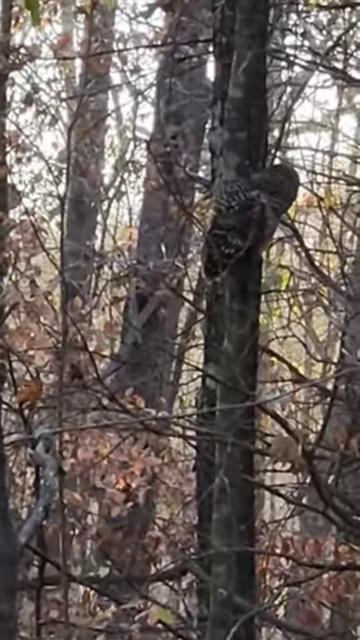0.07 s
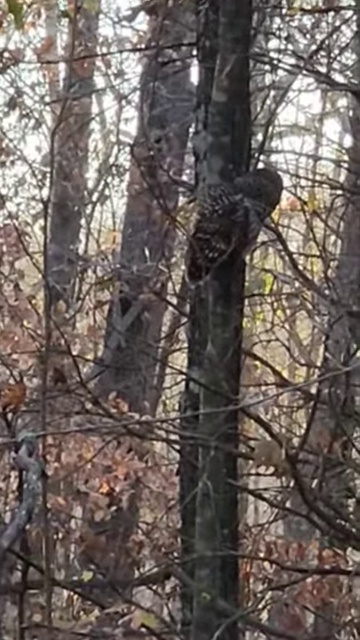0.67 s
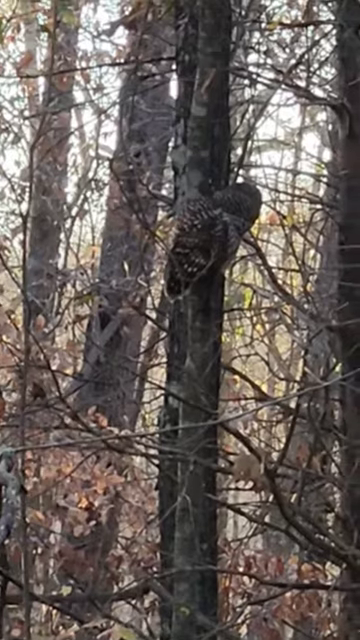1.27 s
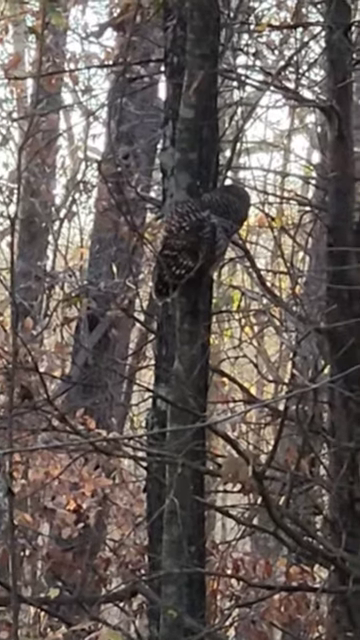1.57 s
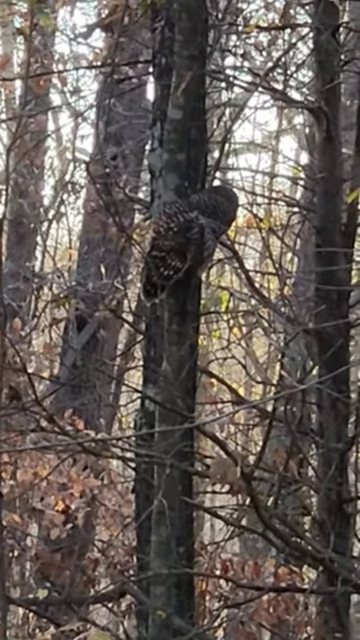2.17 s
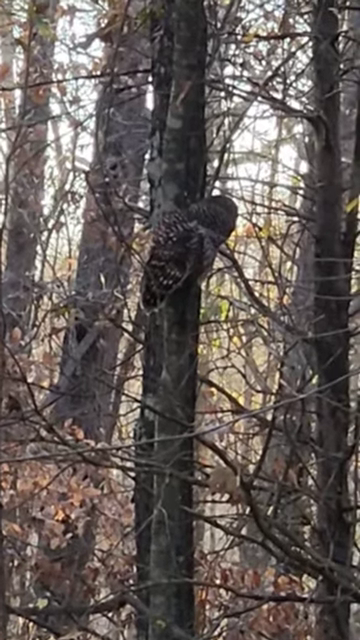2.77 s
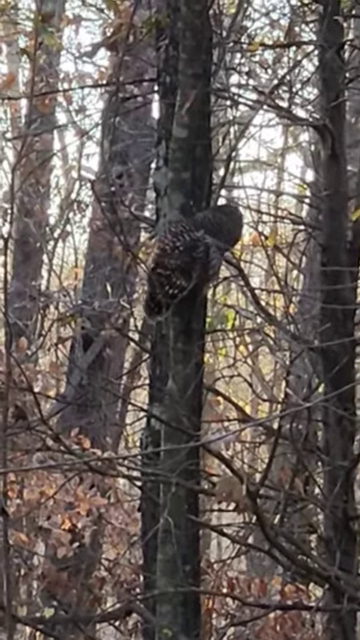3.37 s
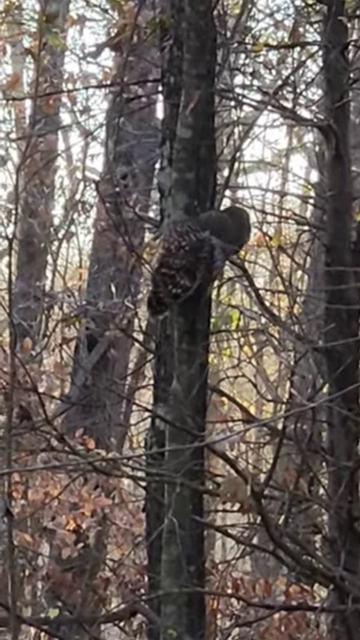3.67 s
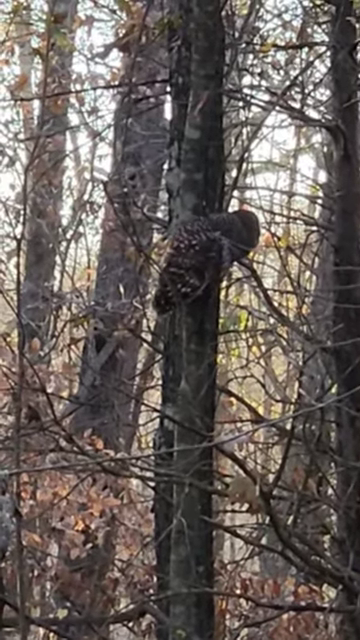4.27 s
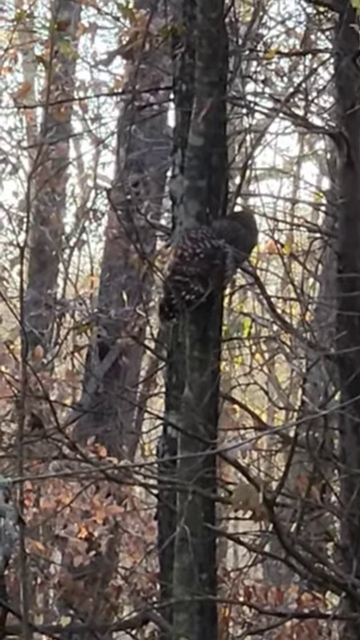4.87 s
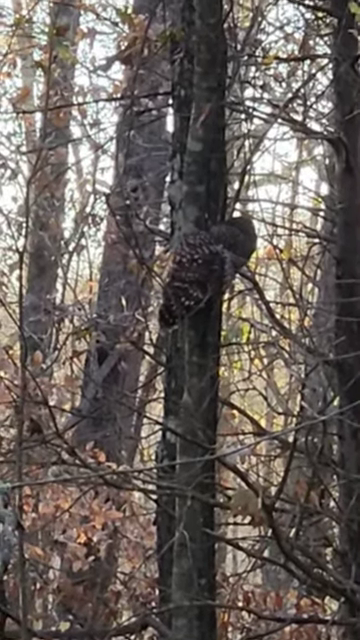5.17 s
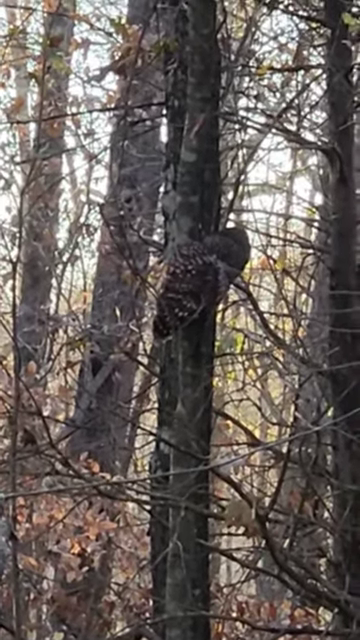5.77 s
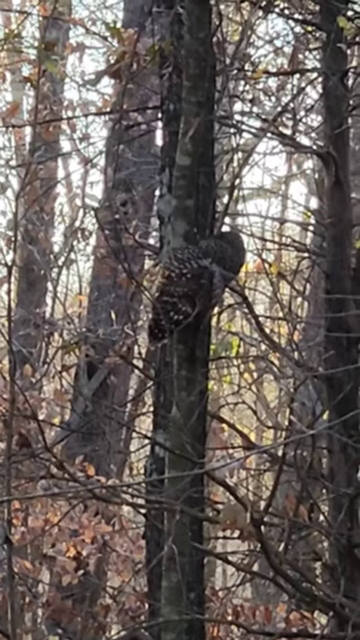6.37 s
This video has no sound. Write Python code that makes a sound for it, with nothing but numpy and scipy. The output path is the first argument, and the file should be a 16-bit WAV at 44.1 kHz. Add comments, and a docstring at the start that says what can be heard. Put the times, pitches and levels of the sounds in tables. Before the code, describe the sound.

In a still wood, a low distant rumble and a soft hiss run throughout. Near the start a hand rubs briefly close to the microphone and a sleeve swishes, followed by a few faint twig ticks and a tiny bird peep. Then an owl gives one hoot, by far the loudest sound: it starts reedy, leaps to a round high note and drops into a raspy downward slide. Soft echoes return from the trees.

```python
"""An owl gives one falling hoot from a pine in a still wood. Membranes in its voice box vibrate:
the call starts reedy, leaps to a round high note and drops back into a reedy slide.
Nearby trunks scatter the hoot, and a far tree line sends it back as echoes.
Before the hoot, a hand rubs on the phone and a sleeve swishes. Twigs tick, small birds peep, and
faint blurred swells, hums and a whistle pass over a low distant rumble and a soft hiss."""
import sys
import numpy as np
from scipy import signal
from scipy.fft import rfft, irfft, next_fast_len
from scipy.io import wavfile
from scipy.ndimage import uniform_filter1d

SR = 44100
rng = np.random.default_rng(int(sys.argv[2]) if len(sys.argv) > 2 else 0)


def generate_wav(signal):
    """Clip the signal to [-1, 1] and save it as 16-bit WAV at the path in sys.argv[1]."""
    frames = np.transpose(np.atleast_2d(signal))
    scaled = np.clip(frames, -1, 1) * 32767
    pcm = np.round(scaled).astype(np.int16)
    wavfile.write(sys.argv[1], SR, pcm)


N = 283122
T = np.arange(N) / SR

# the hoot starts low, leaps to its high note, drops back and slides down to its end
START_S, LEAP_S, DROP_S, END_S = 3.976, 4.038, 4.549, 4.825
LEAP_EASE_S, DROP_EASE_S = .005, .012


def undb(db):
    """Turn decibels into a number to multiply by."""
    return 10 ** (np.asarray(db) / 20)


def unit(x):
    """Scale a signal to an average strength (rms) of 1."""
    return x / np.sqrt(np.mean(x ** 2))


def at(points, hz):
    """Look up a value between (pitch_hz, value) points, spaced by octaves."""
    f, value = np.transpose(points)
    return np.interp(np.log(np.maximum(hz, 1)), np.log(f), value)


def colour(x, points):
    """Turn a sound's lows and highs up or down along (pitch_hz, gain_db) points."""
    n = x.shape[-1]
    size = next_fast_len(n)
    gain = undb(at(points, np.fft.rfftfreq(size, 1 / SR)))
    return irfft(rfft(x, size) * gain, size)[..., :n]


def band(n, hz, octaves):
    """Stereo noise gathered around one pitch."""
    f = np.maximum(np.fft.rfftfreq(n, 1 / SR), 1)
    bell = np.exp(-.5 * (np.log2(f / hz) / octaves) ** 2)
    return unit(irfft(rfft(rng.standard_normal((2, n))) * bell / np.sqrt(f), n))


def walk(rate):
    """A smooth random wobble of size about 1 that changes about rate times a second."""
    k = max(int(SR / rate), 2)
    steps = np.repeat(rng.standard_normal(N // k + 1), k)
    return unit(uniform_filter1d(uniform_filter1d(steps, k), k)[:N])


def pan(db):
    """Left and right gains that make the left side db decibels louder."""
    return undb(np.array([[.5], [-.5]]) * db)


def ramp(s, length):
    """Rise from 0 at time s to 1 over length seconds."""
    return np.clip((T - s) / length, 0, 1)


def flip(s, ease_s):
    """Switch smoothly from 0 to 1 around time s."""
    return .5 + .5 * np.tanh((T - s) / ease_s)


def swell(t, peak_s, width_s):
    """A bell-shaped rise and fall."""
    return np.exp(-.5 * ((t - peak_s) / width_s) ** 2)


def tones(table, waver, rate):
    """Thin gliding tones that swell and fade, their pitch wavering."""
    out = 0
    for s, start_hz, end_hz, width, db in table:
        hz = np.interp(T, [s - width, s + width], [start_hz, end_hz]) * (1 + waver * walk(rate))
        out = out + undb(db) * swell(T, s, width) * np.sin(2 * np.pi * np.cumsum(hz) / SR)
    return out


def background(rumble_db=-54.5, rumble_side_db=-24, air_db=-76.5):
    """A distant rumble, nearly alike on both sides, and the wood's hiss, wider in its highs."""
    # tone of the rumble and of the hissing air: pitch_hz, gain_db
    rumble_tone = [(15, -29), (28, -17.5), (40, -1.5), (52, -6), (64, 5), (75, -4), (88, -4.5), (112, -8),
                   (135, -13), (165, -22.5), (215, -24.5), (330, -36.5), (500, -72)]
    air_tone = [(100, -3), (300, -4), (470, -2.5), (720, -0.5), (950, -4.5), (1500, -3.5), (1900, -6),
                (2300, -13.5), (3300, -16), (4500, -20), (7300, -18.5), (9000, -30.5), (15000, -29)]
    noise = rng.standard_normal((5, N))
    sideways = undb(rumble_side_db) * noise[1] * np.array([[1], [-1]])
    rumble = unit(colour(noise[0] + sideways, rumble_tone))
    shared = colour(noise[2], [(300, -4.5), (700, -2.5), (1400, -11), (3000, -21.5)])
    apart = colour(noise[3:], [(300, 4.5), (700, -5.0), (1400, -1.5), (3000, 0)])
    left, right = apart + shared
    right = colour(right, [(300, -2.5), (1200, -3.5), (4000, -3.5), (7500, -9.0), (14000, 2.0)])
    air = unit(colour(np.array([left, right]), air_tone))
    sway_db = .3 * walk(5)
    return (rumble * undb(rumble_db) + air * undb(air_db)) * undb(sway_db)


def hand(left_db=-12):
    """Skin slips over the phone's case in many tiny catches, close to the right microphone."""
    # strokes of the hand: start_s, rise_s, hold_s, level_db, fade_db_per_s
    strokes = [(0, .1, .33, -79.5, 250), (.483, 0.0082, 0.028, -53, 330),
               (0.555, 0.0047, 0.0057, -56.5, 642), (0.696, .03, 0.046, -73.5, 450)]
    # tone of the rubbed case: pitch_hz, gain_db
    case_tone = [(200, -14), (350, -13), (550, -17), (750, -3), (900, -9), (1150, 1.5), (1600, -4),
                 (2300, -5.5), (3300, -11.5), (4800, -16.5), (7500, -13), (9700, -25.5), (11200, -18),
                 (12500, -23), (15000, -19)]
    slip = sum(ramp(s, rise) * undb(db - fade * np.maximum(T - s - rise - hold, 0))
               for s, rise, hold, db, fade in strokes)
    catches = rng.standard_normal((2, N)) * undb(2.2 * walk(1200))
    return unit(colour(catches, case_tone)) * slip * undb([[left_db], [0]])


def sleeve(peak_s=0.49, peak_db=-68, rise_db_per_s=24, fall_db_per_s=38, left_db=-3):
    """A sleeve shifts with the hand: one soft swish that swells and fades."""
    # tone of the cloth: pitch_hz, gain_db
    cloth_tone = [(100, -16), (200, 2.5), (300, 11.5), (450, -5), (750, 3), (950, -10.5), (1200, 2.5),
                  (1550, -2), (1900, -21), (2700, -15.5), (4500, -23), (8000, -13.5), (10000, -26.5),
                  (14000, -17)]
    level_db = peak_db - np.maximum(rise_db_per_s * (peak_s - T), fall_db_per_s * (T - peak_s))
    swish = unit(colour(rng.standard_normal((2, N)), cloth_tone))
    return swish * undb(level_db + 1.9 * walk(39.1)) * undb([[left_db], [0]])


def hums():
    """Faint low tones come and go far away."""
    # far-off hums: peak_s, start_hz, end_hz, width_s, level_db
    notes = [(.7, 369, 355, 0.35, -82.5), (3.45, 565, 585.5, 0.45, -84.5), (5.7, 345, 341.1, 0.18, -81.5)]
    return tones(notes, waver=.016, rate=40)


def ticks(tail_db=-18, tail_s=0.051):
    """Twigs and fingers make short dry cracks, each with a faint scattered tail."""
    # cracks: start_s, level_db, pitch_hz, width_octaves, decay_ms, left_minus_right_db
    cracks = [(0.707, -68.5, 1930, 0.33, 1.9, -18), (1.021, -62, 2500, 1.6, 0.84, -4),
              (1.112, -66, 2500, 0.45, 1, 8), (1.222, -74, 7300, 0.21, 2.5, 7), (1.33, -78, 2500, 1, 3, 4),
              (1.59, -67, 8440, 0.43, 3, 4), (1.589, -79, 3330, 0.092, 6, 0),
              (2.981, -77, 3500, 0.69, 3.2, 4), (3.678, -72.5, 1890, 0.55, 7.3, 10)]
    out, t = np.zeros((2, N)), T[:SR // 5]
    for s, db, hz, octaves, decay_ms, side_db in cracks:
        fade = np.exp(-t * 1000 / decay_ms) + undb(tail_db) * np.exp(-t / tail_s)
        i = int(s * SR)
        out[:, i:i + len(t)] += band(len(t), hz, octaves) * fade * undb(db) * pan(side_db)
    return out


def faint_swells(grain_db=3):
    """Faint blurred swells near 1.5 kHz, perhaps a distant crow, among soft rustles."""
    # swells of grainy noise: peak_s, level_db, pitch_hz, width_octaves, width_s
    swells = [(1.07, -88.5, 5500, 0.69, 0.12), (1.62, -84, 1410, 0.37, .1),
              (2.056, -75.5, 1530, 0.35, 0.05), (2.854, -80.5, 1260, 0.55, 0.084),
              (2.88, -90.5, 5400, .7, 0.1), (3.454, -84.5, 1540, 0.45, 0.19),
              (5.316, -80, 1450, 0.31, 0.058), (5.808, -88, 7050, 0.22, 0.021)]
    out, grain = np.zeros((2, N)), unit(undb(grain_db * walk(200)))
    for s, db, hz, octaves, width in swells:
        near = np.abs(T - s) < np.pi * width
        out[:, near] += band(near.sum(), hz, octaves) * swell(T[near], s, width) * undb(db)
    return out * grain


def small_birds():
    """Small birds far off give two tiny high peeps."""
    # peeps: peak_s, start_hz, end_hz, width_s, level_db
    peeps = [(1.98, 3750, 3600, .025, -92), (5.67, 3700, 3650, .012, -88)]
    return tones(peeps, waver=.024, rate=300)


def whistle(level_db=-88, waver=0.016, flicker_db=7):
    """A thin wavering whistle from deep in the wood climbs slowly, then droops away."""
    start_s, turn_s, end_s, fade_s = 3.25, 3.55, 3.92, .13
    top_hz, end_hz, climb_hz_per_s, droop_s = 2200, 1270, 650, .1
    climb = climb_hz_per_s * np.minimum(T - turn_s, 0)
    droop = (top_hz - end_hz) * np.exp(-np.maximum(T - turn_s, 0) / droop_s)
    hz = (end_hz + droop + climb) * (1 + waver * walk(30))
    sounding = ramp(start_s, fade_s) * (1 - ramp(end_s - fade_s, fade_s))
    level = undb(level_db + flicker_db * np.tanh(walk(25)))
    return sounding * level * np.sin(2 * np.pi * np.cumsum(hz) / SR)


def melody():
    """The hoot's pitch, and which voice the owl uses: from 0 (low, reedy) to 1 (high, round)."""
    open_hz, climb_hz_per_s = 244.1, 2880
    aim_hz, sag_hz_per_s, scoop_hz, scoop_s = 619.5, 276, 150.45, .087
    slide_hz, slide_hz_per_s = 371.2, 385
    t = np.clip(T, START_S, END_S)
    leapt, dropped = flip(LEAP_S, LEAP_EASE_S), flip(DROP_S, DROP_EASE_S)
    held = np.maximum(t - LEAP_S, 0)
    opening = open_hz + climb_hz_per_s * (t - START_S)
    note = aim_hz - sag_hz_per_s * held - scoop_hz * np.exp(-held / scoop_s)  # rises, then sinks
    slide = slide_hz - slide_hz_per_s * (t - DROP_S)
    high = leapt - dropped
    return (1 - leapt) * opening + high * note + dropped * slide, high


def owl(gain_db=0.8, waver=0.023, flutter_db=3.0, rasp_db=-4, right_lag_s=0.00011, harmonics=12):
    """Vibrating membranes make harmonics (multiples of the pitch): raspy when low, steadier when high."""
    # the hoot's level as heard, dipping briefly where it mingles with its echoes: time_s, relative_db
    loudness = [(3.98, -51.5), (3.992, -47), (4.042, -44.5), (4.058, -38.5), (4.16, -34), (4.328, -35.5),
                (4.346, -39.5), (4.432, -36), (4.524, -42.5), (4.544, -48), (4.58, -44), (4.792, -52),
                (4.8, -53)]
    # how the swollen throat shapes the three lowest harmonics: pitch_hz, gain_db
    pouch_tone = [(250, -22), (325, -11), (365, -6), (400, -5.5), (550, 0.5), (700, -9), (770, -8.5),
                  (850, -10), (1030, -9.5), (1350, -30.5), (1500, -11), (1600, -16.5), (1645, -10.5)]
    # how the throat shapes the upper harmonics: pitch_hz, gain_db
    throat_tone = [(1000, 6), (1250, -15.5), (1530, 10), (1850, -3.5), (1960, -7), (2060, 2), (2200, -3),
                   (2450, -7), (2650, -13.5), (2770, 0), (2880, -13), (3050, -8.5), (3330, -4), (3500, -10),
                   (3700, -5.5), (3950, -13), (4250, -7.5), (4800, -15.5), (8000, -23.5)]
    # tone of the air swirling in the throat: pitch_hz, gain_db
    puff_tone = [(300, -14), (750, 5.5), (1200, -2.5), (1600, -6), (2200, -14.5), (3000, -11),
                 (4500, -13.5), (8000, -20), (11000, -34)]
    # which side the voice is louder on: pitch_hz, left_minus_right_db
    balance = [(300, 2), (380, 3), (470, 8), (545, 2.5), (1050, -0.5), (1450, -4), (1650, -8.5),
               (2300, 10.5), (5000, 5)]
    # the two voices before the throat shapes them: second_db, third_db, upper_db, roughness (0 to 1)
    reedy, rounded = (-2, -10, -31, 0.91), (-12, -6.5, -40, 0.2039)
    rise_s, fade_s, slide_db = 0.0029, 0.021, -1
    brightening, upper_db_per_octave = 0.82, -13
    harsh_after_s, harsh_width_s, harsh_db = .035, .025, 7
    pure_hz, pure_width_hz = 554, 30

    hz, high = melody()
    second_db, third_db, upper_db, rough = np.outer(reedy, 1 - high) + np.outer(rounded, high)
    loud_db = gain_db + np.interp(T, *np.transpose(loudness)) + slide_db * flip(DROP_S, DROP_EASE_S)
    upper_db += loud_db + high * brightening * (loud_db - loud_db.max())  # louder is brighter
    upper_db += harsh_db * swell(T, DROP_S + harsh_after_s, harsh_width_s)  # harsh just after the drop
    # near pure_hz the membranes swing evenly and the second harmonic vanishes
    uneven = np.tanh(np.abs(hz - pure_hz) / pure_width_hz)
    source = [1, uneven * undb(second_db), undb(third_db)]
    low = np.array([size * undb(at(pouch_tone, k * hz)) for k, size in enumerate(source, 1)])
    low = low / np.linalg.norm(low, axis=0) * undb(loud_db)  # these three share the loudness
    phase = 2 * np.pi * np.cumsum(hz * (1 + waver * rough * walk(250))) / SR
    late = np.array([[0], [1]]) * 2 * np.pi * hz * right_lag_s
    voice = 0
    for k in range(1, harmonics + 1):
        if k <= len(low):
            size = low[k - 1]
        else:  # upper harmonics weaken with each octave, and flicker
            db = upper_db + upper_db_per_octave * np.log2(k / (len(low) + 1.44))
            size = undb(db + at(throat_tone, k * hz) + 7 * np.tanh(walk(26)))
        sides = pan(at(balance, k * hz))
        sides = sides / np.sqrt(np.mean(sides ** 2, axis=0))
        voice = voice + np.sqrt(2) * size * sides * np.sin(k * (phase - late))
    # the membranes let one puff of air through on each swing
    puffs = unit(colour(rng.standard_normal((2, N)), puff_tone) * (1 + np.cos(phase)))
    flutter = undb(flutter_db * rough * np.tanh(walk(180)))
    sounding = ramp(START_S, rise_s) * (1 - ramp(END_S - fade_s, fade_s))
    return sounding * (voice * flutter + puffs * rough * undb(upper_db + rasp_db))


def squeaks():
    """The owl's throat squeaks briefly as its voice breaks."""
    # squeaks: peak_s, start_hz, end_hz, width_s, level_db
    notes = [(4.02, 3450, 3430, 0.02493, -88.5), (4.58, 5200, 5230, .014, -82.5),
             (4.622, 2726, 2780, 0.0084, -75.5)]
    return tones(notes, waver=0.009, rate=400)


def wood_echoes(voice, near_db=-19, near_s=1.0, linger_db=-41, linger_s=4, rise_s=0.018, width=0.17):
    """Near trunks scatter the call into a fading tail; groups of far trunks return blurred echoes."""
    # echoes from groups of trunks: delay_s, spread_s, relative_level_db
    echoes = [(0.061, .025, -22), (.2, .093, -13.5), (.42, .09, -26.5), (1.05, .11, -36.5)]
    # tone of what the trunks send back: pitch_hz, gain_db
    trunk_tone = [(150, -12), (330, -8.5), (480, -4.5), (545, 0), (600, 3.5), (710, 4.5), (850, -2),
                  (1100, -7), (1600, -14), (3000, -10), (9000, -14)]
    t = T[:2 * SR]
    scatter = rng.standard_normal((3, len(t))) * rng.exponential(size=len(t))
    scatter = unit(scatter[0] + width * scatter[1:])  # mostly alike on the left and right
    rise = 1 - np.exp(-(t / rise_s) ** 2)
    shapes = [(rise * undb(-60 * t / near_s), near_db), (rise * undb(-60 * t / linger_s), linger_db)]
    shapes += [(swell(t, delay, spread), db) for delay, spread, db in echoes]
    power = sum(undb(db) ** 2 * shape ** 2 / np.sum(shape ** 2) for shape, db in shapes)
    response = colour(scatter * np.sqrt(power), trunk_tone)
    return signal.fftconvolve(voice.mean(axis=0)[None], response, axes=1)[:, :N]


def scene():
    """The owl and its echoes among the small sounds of the wood."""
    voice = owl() + squeaks()
    far_off = small_birds() + hums()
    call = voice + wood_echoes(voice)
    return call + hand() + sleeve() + ticks() + faint_swells() + whistle() + far_off + background()


def record(dry):
    """The phone cuts off the very highest sounds."""
    top_hz = 15550
    return signal.sosfilt(signal.ellip(10, .1, 70, top_hz, fs=SR, output="sos"), dry)


dry = scene()
out = record(dry)
generate_wav(out)
```